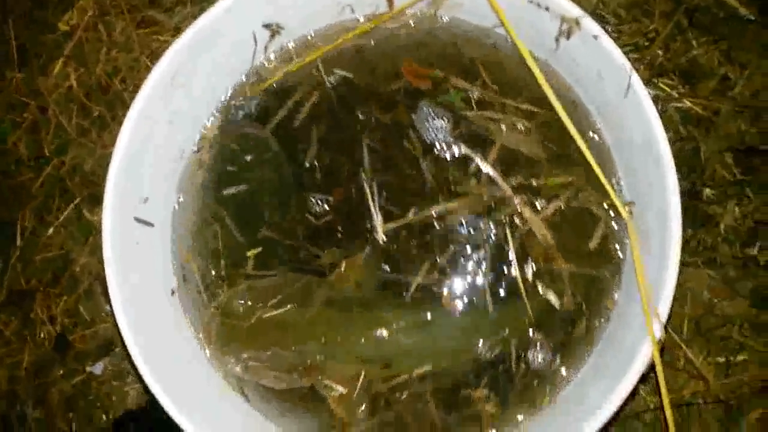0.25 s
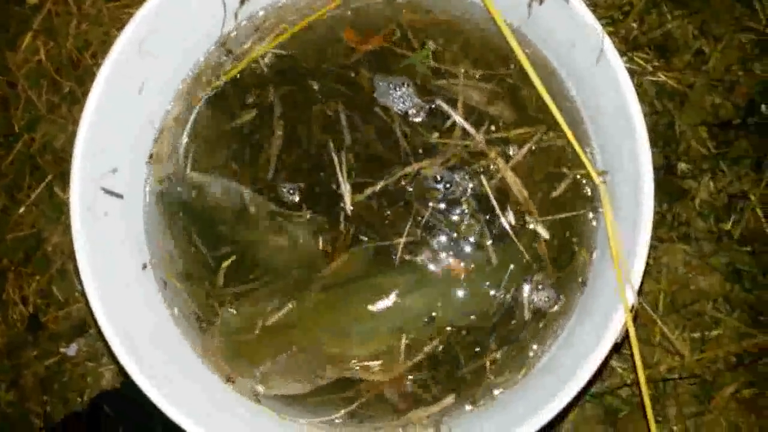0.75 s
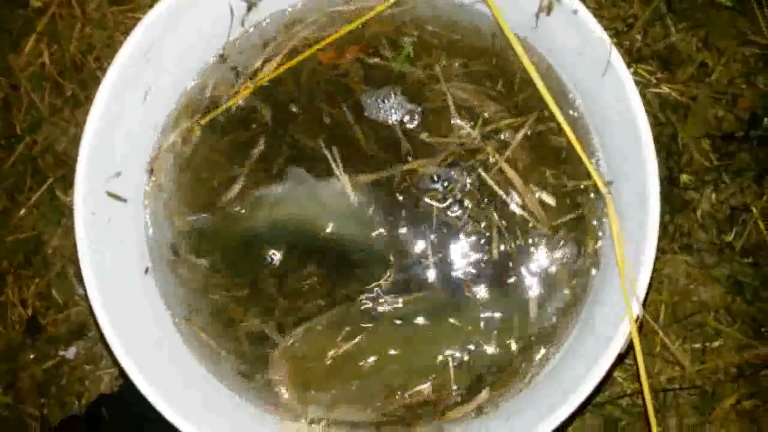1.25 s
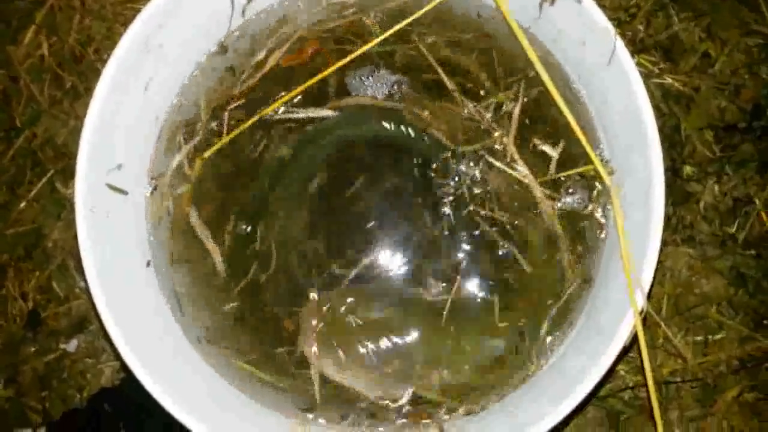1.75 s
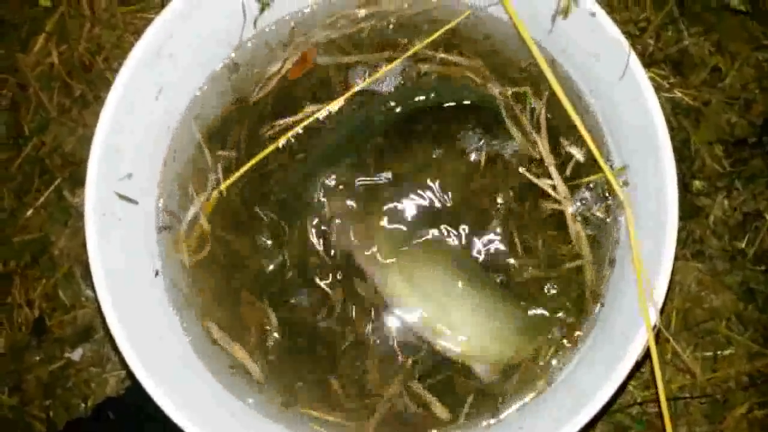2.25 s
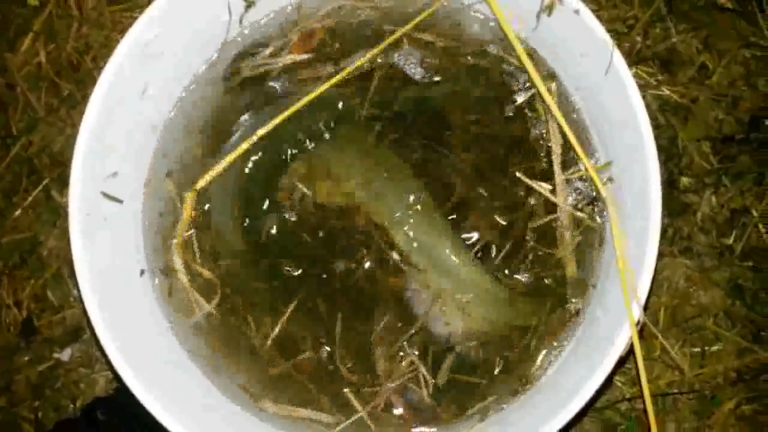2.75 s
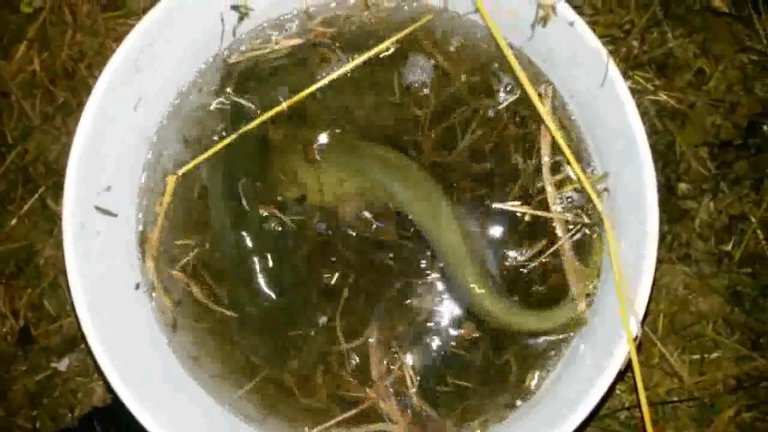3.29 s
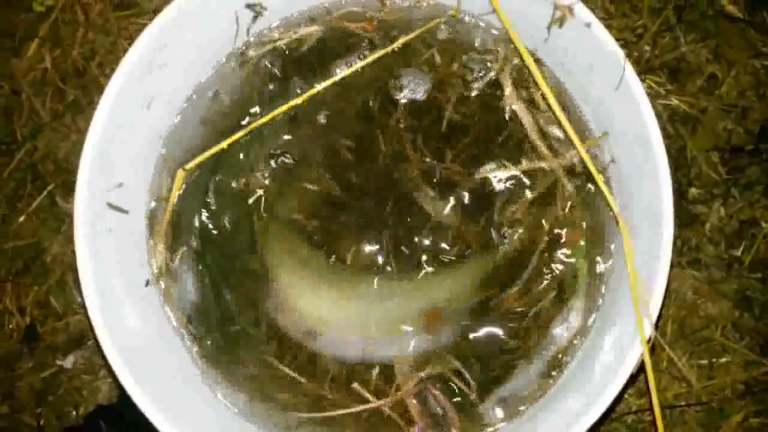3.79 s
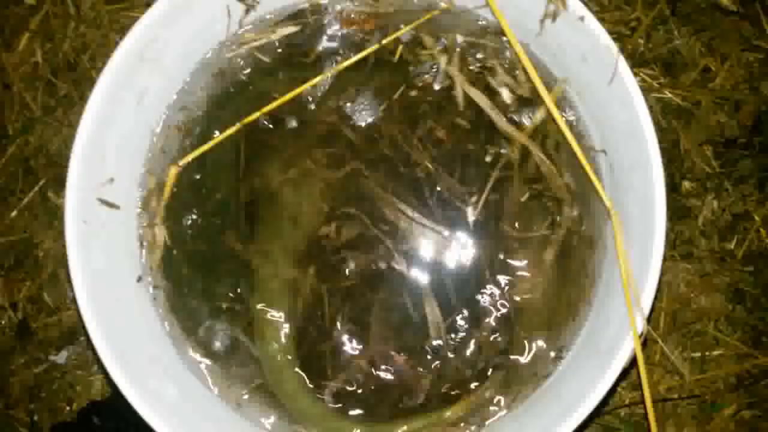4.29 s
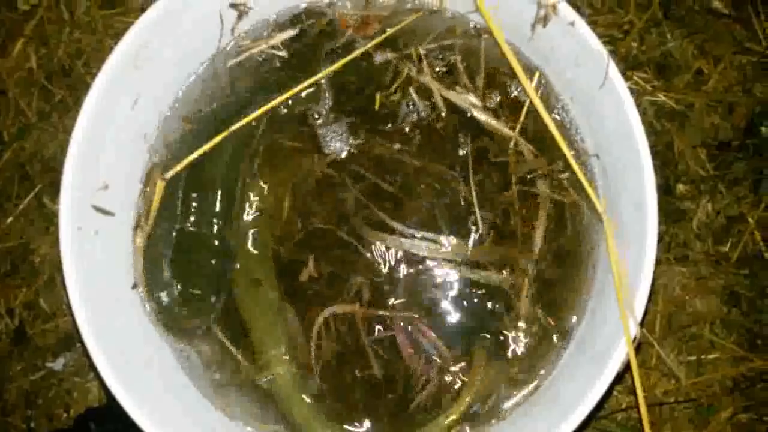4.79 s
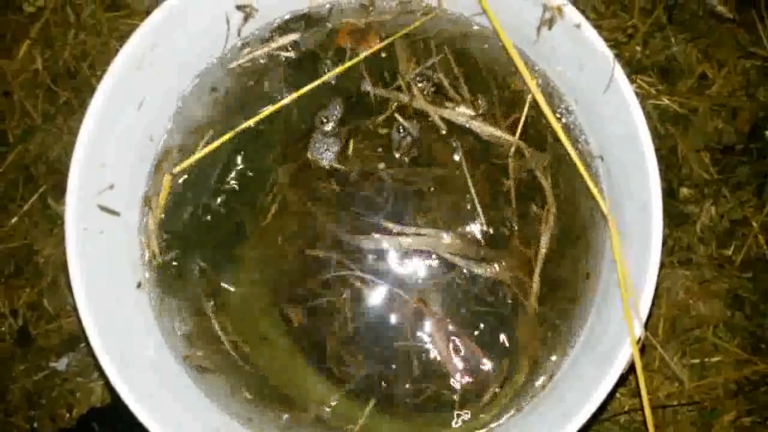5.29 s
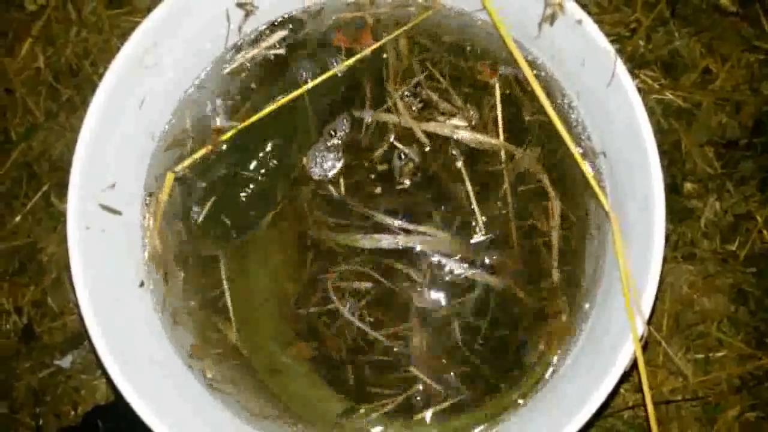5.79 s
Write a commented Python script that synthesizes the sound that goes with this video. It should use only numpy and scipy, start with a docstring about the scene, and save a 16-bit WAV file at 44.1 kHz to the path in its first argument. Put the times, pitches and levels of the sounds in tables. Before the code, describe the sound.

Distant city traffic rumbles and softly roars under a steady thin hiss at night outdoors, with one tiny bubble tick close by near the start.

```python
"""Distant city traffic at night, heard from a river bank above a bucket of water.
Many far engines merge into a rumble, their tyres into a soft roar under a thin hiss: coloured noises.
One heavy engine, three sine harmonics, drones and fades; single tyres swell as noise bands.
Later other engines hum by as single sine notes and one booms; a bubble, a brief ring, ticks once."""
import sys
import numpy as np
from scipy import signal
from scipy.fft import rfft, irfft
from scipy.io import wavfile

SR = 44100
rng = np.random.default_rng(int(sys.argv[2]) if len(sys.argv) > 2 else 0)


def store_pcm(level_fs):
    """Save levels as 16-bit WAV."""
    pcm = np.round(np.clip(level_fs, -1, 1) * 32767).astype(np.int16)
    wavfile.write(sys.argv[1], SR, np.atleast_2d(pcm).T)


N = 266496
TIME_S = np.arange(N) / SR


def undb(db):
    """Decibels to gain."""
    return 10 ** (np.asarray(db) / 20)


def unit(x):
    """Scale to rms 1."""
    return x / np.sqrt(np.mean(x ** 2))


def curves(table):
    """Each column of a time table, interpolated sample by sample."""
    time_s, *columns = np.transpose(table)
    return [np.interp(TIME_S, time_s, column) for column in columns]


def walk(rate_hz):
    """Smooth random curve of rms 1: noise under a Gaussian low-pass of width rate_hz, mean removed."""
    hz = np.fft.rfftfreq(N, 1 / SR)
    lowpass = np.exp(-(hz / rate_hz) ** 2) * (hz > 0)
    return unit(irfft(rfft(rng.standard_normal(N)) * lowpass, N))


def swell(centre_s, spread_s):
    """Gaussian rise and fall around a moment; spread_s is its standard deviation."""
    return np.exp(-((TIME_S - centre_s) / spread_s) ** 2 / 2)


def far_noise(colour, waver_db, waver_hz, bands):
    """Noise of a given colour, rms 1; each of its bands wavers on its own."""
    octave = np.log2(np.fft.rfftfreq(N, 1 / SR) + 1)
    hz, db = np.transpose(colour)
    corners = np.log2(hz)
    outside = np.abs(octave - np.clip(octave, corners[0], corners[-1]))
    skirt_db = -18 * outside  # 18 dB per octave beyond the end corners
    spectrum = rfft(rng.standard_normal(N)) * undb(np.interp(octave, corners, db) + skirt_db)
    centres = np.linspace(corners[0], corners[-1], bands)
    total = 0
    for share in np.eye(bands):  # overlapping triangles that sum to 1
        band = irfft(spectrum * np.interp(octave, centres, share), N)
        total = total + band * undb(waver_db * walk(waver_hz))
    return unit(total)


def far_traffic():
    """Many engines merge into low noise, their tyres into mid-range noise."""
    # Each row: frequency in Hz, density in dB per Hz.
    rumble_colour = [(20, -10), (36, -17), (52, 0.5), (68, 1), (100, 0), (140, -1), (235, -2.5), (310, -10),
                     (450, -20), (900, -45)]
    roar_colour = [(200, -10.5), (400, -7.5), (600, -4.5), (800, -2), (930, 1.15), (1040, -1.1),
                   (1250, -4.5), (1650, -6.5), (2100, -13.5), (2900, -24.5), (5000, -34.5)]
    # Each row: time in seconds, engine rumble level in dB, tyre roar level in dB.
    traffic_levels = [(0, -35, -35.5), (2.0, -34, -33.5), (2.8, -33, -34.5), (4.3, -33.5, -34),
                      (6.04, -33.5, -35)]
    rumble_db, roar_db = curves(traffic_levels)
    rumble = far_noise(rumble_colour, waver_db=-1.1, waver_hz=2.3, bands=7) * undb(rumble_db)
    roar = far_noise(roar_colour, waver_db=0.1, waver_hz=3.8, bands=8) * undb(roar_db)
    return rumble + roar


def passing_stream():
    """A nearer stream of cars; grazing over soft ground, it falls with the square of the distance."""
    # Each row: frequency in Hz, density in dB per Hz.
    passing_colour = [(150, -9), (270, 1), (420, -0.5), (780, -5), (1200, -6), (1700, -44)]
    closest_s, closest_db = 3, -41
    width_s = 1.54  # time in which it covers its own closest distance
    distance = np.hypot(1, (TIME_S - closest_s) / width_s)  # 1 at the closest point
    noise = far_noise(passing_colour, waver_db=1.5, waver_hz=6.7, bands=5)
    return noise * undb(closest_db) / distance ** 2


def thin_hiss():
    """High noise over the traffic, with a faint top that is strongest midway."""
    # Each row: frequency in Hz, density in dB per Hz.
    hiss_colour = [(1100, -2), (1700, 5.5), (2400, 5.5), (3050, 1), (3550, 2.5), (3950, -1), (4900, -2),
                   (6200, -9.5), (7300, -13), (8800, -31.5), (11000, -27)]
    air_colour = [(6500, -3), (7800, 5), (9000, 1.5), (11000, -7), (14500, -6.5)]
    # Each row: time in seconds, level in dB.
    hiss_levels = [(0, -42), (.9, -43), (1.7, -43), (2.3, -45), (3.2, -45), (4.1, -43.5), (4.9, -43),
                   (5.5, -41.5), (6.04, -41.5)]
    air_levels = [(0, -68), (1.8, -66), (2.9, -62.5), (4.2, -67), (6.04, -66.5)]
    hiss_db, = curves(hiss_levels)
    air_db, = curves(air_levels)
    hiss = far_noise(hiss_colour, waver_db=0.63, waver_hz=3.3, bands=4) * undb(hiss_db)
    air = far_noise(air_colour, waver_db=1.0, waver_hz=6, bands=3) * undb(air_db)
    return hiss + air


def tyres():
    """Single cars come through gaps along the road, each a swelling noise band of its own pitch."""
    # Each row: centre in seconds, level in dB, pitch in Hz, spread in seconds.
    tyre_swells = [(.4, -45.5, 1550, 0.78), (2.082, -40.5, 920, 0.23), (1.88, -45, 1480, 0.56),
                   (3.34, -40, 795, 0.16), (3.85, -41, 1090, 0.43), (4.382, -42, 720, 0.19),
                   (4.898, -43.5, 550, 0.42)]
    # Each row: multiple of the pitch, density in dB per Hz.
    tyre_colour = [(.6, -16), (.87, -6), (1.15, -1), (1.6, -33)]
    out = 0
    for centre_s, db, pitch_hz, spread_s in tyre_swells:
        colour = [(pitch_hz * multiple, density_db) for multiple, density_db in tyre_colour]
        noise = far_noise(colour, waver_db=0.5, waver_hz=4.1, bands=3)
        out = out + noise * undb(db) * swell(centre_s, spread_s)
    return out


def lorry(wander):
    """A heavy engine drones at a nearly steady speed; its three lowest harmonics fade separately."""
    # Each row: time in seconds, level in dB.
    first_levels = [(0, -38), (.46, -58), (.65, -33), (.87, -44.5), (1.06, -34.5), (1.3, -43),
                    (1.55, -35.5), (1.7, -34), (1.92, -54), (2.07, -34.5), (2.2, -44.5), (2.35, -38.5),
                    (2.65, -45), (3.0, -54), (6.04, -56)]
    second_levels = [(0, -42), (.6, -45.5), (.95, -36.5), (1.15, -44), (1.55, -39.5), (1.72, -42.5),
                     (1.9, -33), (2.15, -48), (2.5, -47), (2.85, -37.5), (3.02, -42), (3.22, -38),
                     (3.4, -64), (6.04, -52)]
    third_levels = [(0, -45.5), (.7, -45), (1.1, -45), (2.2, -55.5), (3.2, -47), (6.04, -65)]
    levels_db = curves(first_levels) + curves(second_levels) + curves(third_levels)
    firing_hz = 79.6 * (1 + wander * walk(8.4))
    phase = 2 * np.pi * np.cumsum(firing_hz) / SR
    out = 0
    for harmonic, db in enumerate(levels_db, 1):
        tone = np.sin(harmonic * phase + 2 * np.pi * rng.random())
        out = out + np.sqrt(2) * undb(db) * tone  # sqrt(2): levels are rms
    return out


def hums(wander, fading_db):
    """One exhaust note of each passing engine carries: it swells, sinks a little in pitch and fades."""
    # Each row: centre in seconds, level in dB, pitch at the centre in Hz, spread in seconds.
    hum_notes = [(2.351, -42, 240, 0.11), (3.705, -42.5, 77, 0.35), (3.999, -40, 216.5, 0.33),
                 (4.25, -38.5, 186, 0.23), (4.595, -41.5, 72.5, 0.15), (4.849, -44, 196.8, 0.19),
                 (5.452, -43.5, 214.4, 0.49), (5.707, -44, 63.8, .25)]
    sag_per_s = .025  # share of its pitch lost each second
    out = 0
    for centre_s, db, hz, spread_s in hum_notes:
        pitch_hz = hz * (1 - sag_per_s * (TIME_S - centre_s) + wander * walk(7.8))
        note = np.sin(2 * np.pi * (np.cumsum(pitch_hz) / SR + rng.random()))
        level_db = db + fading_db * walk(13.0)
        out = out + unit(note) * undb(level_db) * swell(centre_s, spread_s)
    return out


def exhaust():
    """A passing engine's exhaust booms briefly: a swell of low noise."""
    # Each row: frequency in Hz, density in dB per Hz.
    boom_colour = [(140, -18), (175, 0), (240, 2.5), (290, -12), (400, -35)]
    centre_s, level_db, spread_s = 4.28, -39, 0.21
    noise = far_noise(boom_colour, waver_db=-2.5, waver_hz=3, bands=3)
    return noise * undb(level_db) * swell(centre_s, spread_s)


def bubble():
    """The film snaps, the tiny cavity rings for a few cycles, and the bucket wall echoes it."""
    start_s, level_db, ring_hz = .91476, -22.3, 4950
    peak_s = .00025  # from the start to the envelope's peak
    snap_db, snap_highpass_hz = -17, 10000  # noise level before the high-pass, against the ring
    echo_s, echo_db = .0011, -15
    t = np.maximum(TIME_S - start_s, 0)
    envelope = t / peak_s * np.exp(1 - t / peak_s)
    highpass = signal.butter(2, snap_highpass_hz, "highpass", fs=SR, output="sos")
    snap = undb(snap_db) * signal.sosfilt(highpass, rng.standard_normal(N))
    ring = np.sin(2 * np.pi * ring_hz * t)
    pop = undb(level_db) * envelope * (ring + snap)
    return pop + undb(echo_db) * np.roll(pop, int(echo_s * SR))


def scene():
    """Far traffic, the tyres and engines that stand out of it, and the water close by."""
    traffic = far_traffic() + passing_stream() + thin_hiss()
    engines = lorry(wander=0.0031) + hums(wander=0.0176, fading_db=2.0) + exhaust()
    return (traffic + tyres() + engines + bubble())[None]


def record(dry):
    """The recorder cuts the top with a steep low-pass at 14450 Hz."""
    return signal.sosfilt(signal.ellip(10, .1, 70, 14450, fs=SR, output="sos"), dry)


dry = scene()
out = record(dry)
store_pcm(out)
```